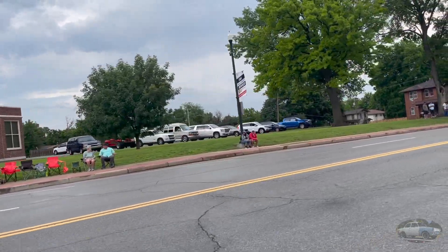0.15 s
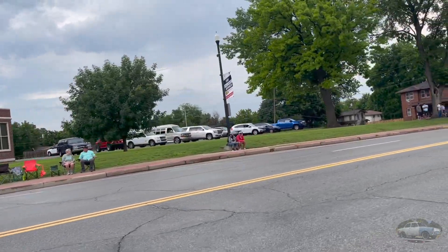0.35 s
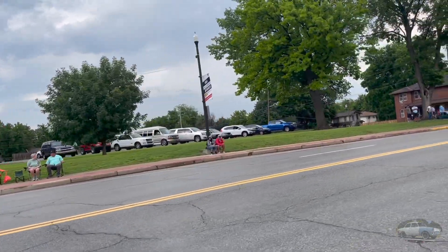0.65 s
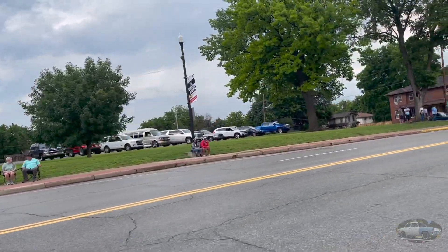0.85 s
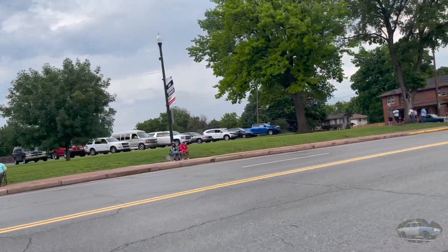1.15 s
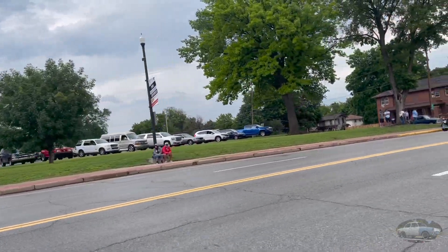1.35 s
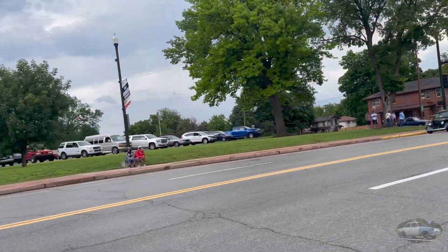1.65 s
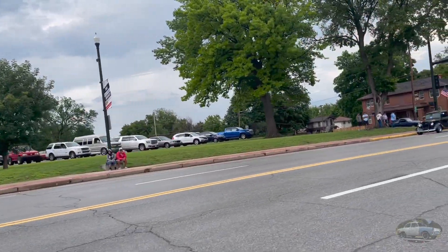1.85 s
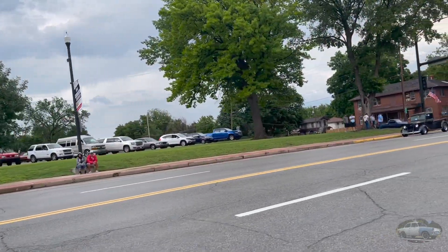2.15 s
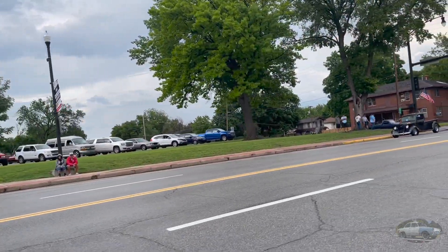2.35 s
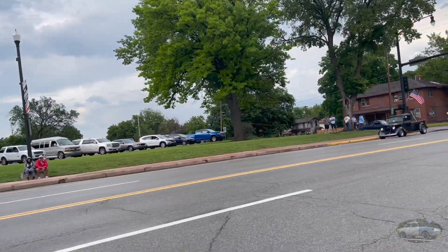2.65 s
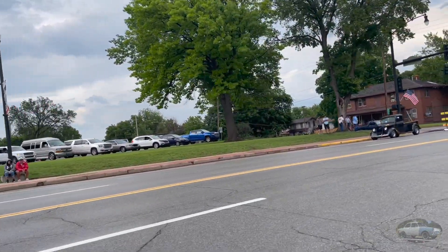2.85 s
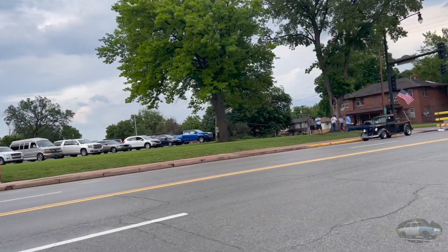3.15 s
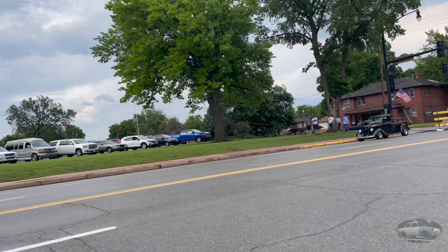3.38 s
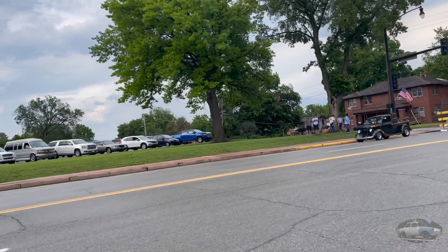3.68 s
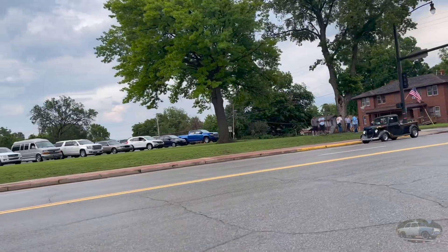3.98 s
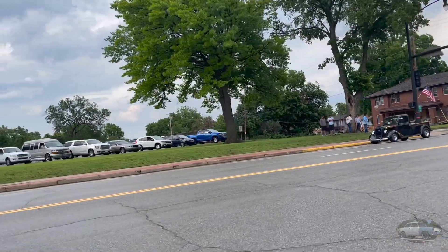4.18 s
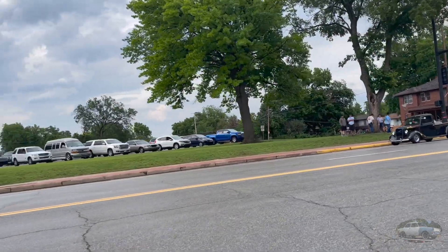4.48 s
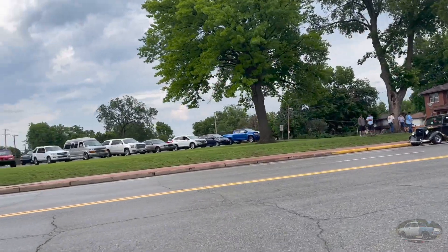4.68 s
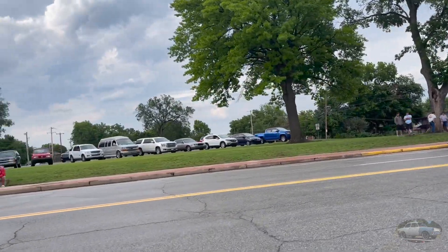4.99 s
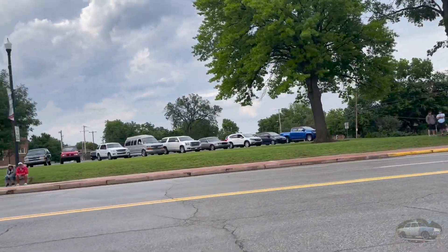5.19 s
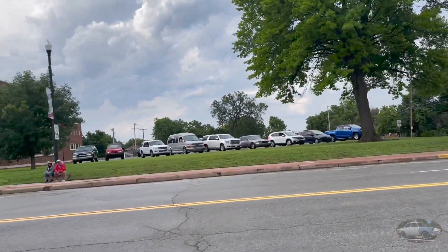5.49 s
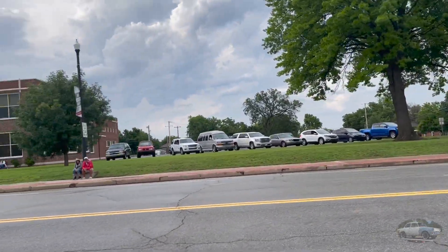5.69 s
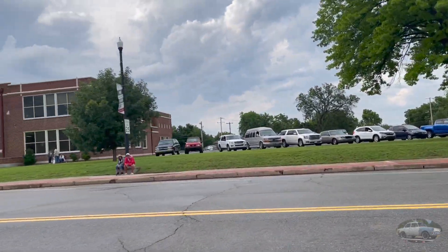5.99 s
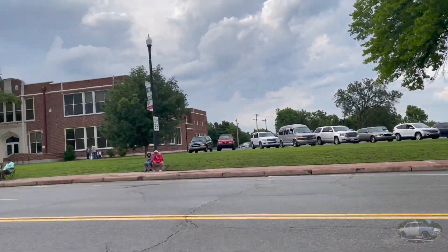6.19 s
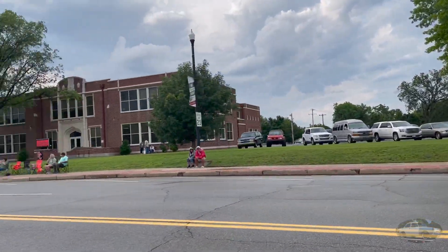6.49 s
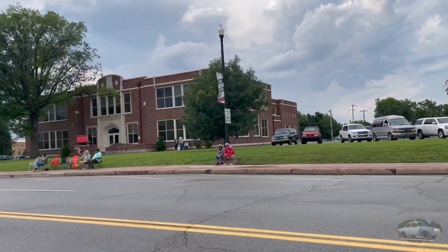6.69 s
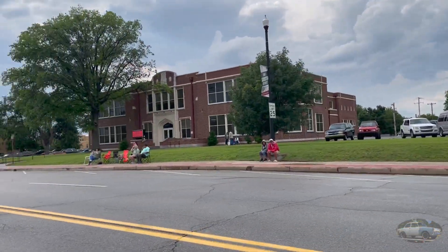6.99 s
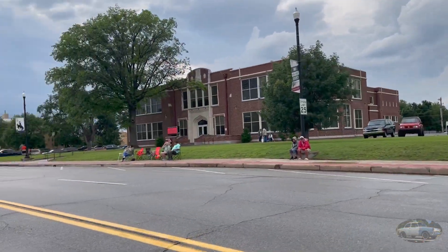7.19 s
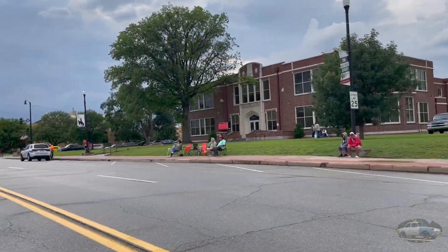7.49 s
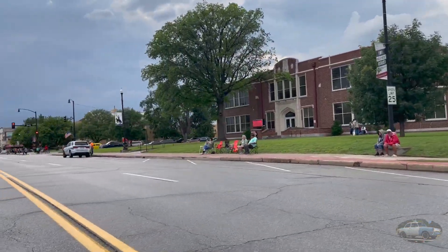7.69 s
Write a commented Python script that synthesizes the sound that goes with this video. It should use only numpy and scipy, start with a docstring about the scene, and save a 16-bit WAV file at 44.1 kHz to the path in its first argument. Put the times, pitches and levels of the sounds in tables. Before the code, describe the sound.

Inside a car by an open side window on a town street, a V8 burbles at low revs with a faint whine over deep road rumble and soft tyre roar. Around three seconds the throttle eases; the pitch sinks and the cabin booms. Wind then grows, with faint whistles, hiss and dense low thumps on the microphone as it swings round. Near the end the bass briefly thins.

```python
"""A V8 car rolls along a town street at low revs, heard by an open side window.
First, engine lines form a burble and thin whine over noise-shaped road rumble and tyre roar.
The throttle is eased at 3.3 s: the revs sink, resonant noise booms in the cabin, and an axle tone sings a while.
The draught (filtered noise) then swells, with faint whistles, gusts and short buffets on the microphone.
It swings round from 5.6 s, moving the exhaust in stereo; from 6.7 to 7.3 s the bass drops away."""
import sys
import numpy as np
from scipy import signal
from scipy.fft import rfft, irfft
from scipy.io import wavfile

SR = 44100
rng = np.random.default_rng(int(sys.argv[2]) if len(sys.argv) > 2 else 0)


def generate_wav(sig):
    """Save sig (samples, or channels by samples) to the path in sys.argv[1] as 16-bit PCM at SR."""
    pcm = np.round(np.clip(np.atleast_2d(sig).T, -1, 1) * 32767).astype(np.int16)
    wavfile.write(sys.argv[1], SR, pcm)


N = 345744
TIME_S = np.arange(N) / SR

# Microphone ports: (frequency [Hz], left-right likeness [-1..1], left lead [rad])
PORTS = [(40, .98, 0), (90, .95, 0), (250, .8, .2), (480, .3, 1.3), (700, .6, 2.2), (1200, .35, 3.2),
         (2100, .5, 6.1), (3300, .7, 7.5), (4900, .3, 7.0), (6500, .7, 6.3), (7700, .7, 6.9),
         (8600, .98, 6.25), (9400, .82, 4.6), (10230, .995, 3.14), (11100, .72, 1.6), (11800, .99, 0)]

# Noise spectra, relative levels: (frequency [Hz], density [dB per Hz])
RUMBLE_SPECTRUM = [(22, -25), (36, -12), (48, -4.5), (60, -3), (84, -2), (105, -5), (125, -9), (150, -3),
                   (176, -4.5), (195, -15), (270, -24), (400, -42.5), (800, -70)]
TYRE_SPECTRUM = [(150, -7), (330, -0.5), (480, -1), (580, -3.5), (710, -1.5), (800, -8.5), (1000, -4.5),
                 (1090, -7.5), (1250, -12), (2100, -17.5), (3000, -24.5), (4300, -27), (5300, -28.5),
                 (7200, -33.5), (10200, -30), (11300, -28.5), (11900, -66)]
TURBULENCE_SPECTRUM = [(30, -14), (70, 4), (125, 11), (230, 1), (330, -8), (520, -18.5), (750, -18.5),
                       (1200, -40.5), (3000, -42.5)]
RUSH_SPECTRUM = [(900, 6), (1550, 7), (1850, 6), (2450, 6), (3200, 2), (3850, 3.5), (4450, -17),
                 (5700, -16), (8000, -40)]
HISS_SPECTRUM = [(2000, -7), (5000, -1), (5750, -3), (6450, 3), (7500, -2), (8500, 5.5), (9400, 1),
                 (10150, -1.5), (11000, -5), (12200, -10)]

# Gusts on the microphone: (start [s], end [s], turbulence level [dB])
GUSTS = [(4.749, 5.61, -36), (5.678, 6.627, -29), (6.738, 7.24, -39), (7.323, 7.794, -34.5)]
# Lasting changes of the draught: (start [s], rise [s], rush gain [dB], hiss gain [dB], thin-hiss gain [dB])
DRAUGHT_SWELLS = [(4.2, 0.33, 6, 3, 13), (4.9, 0.56, 0.5, 2, 5), (6.3, 0.54, 4, 7.5, 4.5),
                  (7.5, 0.19, 1.5, 4.5, -18)]
# Brief flares of the draught: (centre [s], rush level [dB], hiss level [dB], length [s])
DRAUGHT_FLARES = [(0.95, -64, -59, .012), (5.355, -67, -60, 0.012), (6.645, -60, -51, 0.0064),
                  (6.798, -50.5, -53, 0.007), (6.87, -55, -62, 0.01), (7.16, -49.5, -48, 0.0063),
                  (7.215, -49.5, -52, 0.014), (7.385, -53, -56.5, 0.019), (7.435, -54.5, -64, 0.008),
                  (7.662, -51, -53, .011), (7.728, -47, -54, 0.013), (7.785, -57, -70, .016)]
# Air whistling at the window edge: (centre [s], frequency [Hz], level [dB], length [s])
WHISTLES = [(4.7, 2900, -66, .22), (4.47, 2900, -66, .04), (4.68, 2950, -61, .04), (4.728, 4260, -63, .03),
            (4.86, 2950, -62, .035), (4.985, 3400, -62, .018), (5.355, 4350, -66, .015),
            (6.81, 3300, -57, .015), (6.87, 2850, -54, .018)]
# Wind buffets: (start [s], peak before panning [dB], length [s], upper edge [Hz])
BUFFETS = [(4.897, -19.5, 0.014, 496), (5.143, -32, .016, 380), (5.345, -30, 0.019, 344),
           (5.644, -22, 0.014, 435), (5.715, -20.5, 0.028, 326), (5.785, -20.5, 0.03, 360),
           (5.805, -22.5, 0.0056, 560), (5.856, -14, 0.019, 486), (5.924, -14, 0.016, 483),
           (5.948, -25.5, 0.014, 735), (6.004, -22, 0.012, 515), (6.076, -12, 0.012, 464),
           (6.098, -18, 0.023, 350), (6.117, -14, 0.0095, 490), (6.13, -19, 0.032, 294),
           (6.198, -18, 0.021, 465), (6.217, -22, 0.021, 395), (6.31, -21.5, .016, 315),
           (6.36, -21.5, 0.037, 276), (6.396, -15, 0.015, 354), (6.417, -13, 0.011, 556),
           (6.433, -14, 0.0047, 480), (6.497, -18.5, 0.0032, 890), (6.502, -13, 0.011, 526),
           (6.542, -23, 0.0099, 666), (6.59, -19.5, 0.0101, 506), (6.604, -15, 0.014, 530),
           (6.655, -21, 0.017, 218), (6.772, -25, 0.031, 484), (6.882, -25.5, 0.013, 694),
           (6.914, -27, 0.013, 403), (6.999, -26, 0.0048, 900), (6.997, -17.5, 0.008, 434),
           (7.078, -27, .009, 600), (7.388, -25, 0.014, 423), (7.531, -21.5, 0.0047, 910),
           (7.53, -16.5, 0.0052, 455), (7.722, -21, 0.018, 392), (7.772, -13, 0.004, 335),
           (7.779, -15, 0.0078, 544)]

# Level the body panels give a higher engine line: (frequency [Hz], level [dB])
PANELS = [(250, -59.5), (370, -60.5), (410, -62), (500, -62.5), (545, -65), (610, -65), (660, -61.5),
          (700, -56.5), (730, -61), (790, -71), (860, -73), (920, -70), (1010, -68.5), (1200, -77)]
# Lines that stand out or sink: (multiple of cycle rate, cruising gain [dB], off-throttle gain [dB])
WHINE_LINES = [(36, -5, -4), (38, -7, -1), (39, 3, -4), (40, -6, -3), (42, 5, -2), (43, -1.5, -3),
               (44, -2, -3), (45, -4, 2), (46, 5, 0), (47, -1, -4), (48, 0, 4), (49, -1, -6), (50, -3, 2)]
# Engine speed: (time [s], four-stroke cycle rate [Hz])
ENGINE_SPEED = [(0.0, 17.01), (0.7, 16.86), (1.4, 16.77), (2.1, 16.58), (2.9, 16.53), (3.4, 16.28),
                (4.0, 15.71), (4.5, 15.21), (5.1, 14.51), (5.6, 13.94), (6.1, 13.07), (6.8, 12.46),
                (7.3, 12.12), (7.84, 12.03)]
# Exhaust lines: (multiple of cycle rate, cruising [dB], coasting [dB], idling [dB])
EXHAUST_LINES = [(2, -41, -50, -60), (3, -38, -45, -49), (4, -27, -32, -36), (5, -34, -31, -33.5),
                 (6, -33, -28, -34), (7, -36, -47, -39), (8, -41, -39, -36), (9, -42, -46, -40),
                 (10, -47, -49, -48), (11, -41, -41, -45), (12, -45, -51, -48), (13, -49, -48, -50),
                 (14, -51, -57, -44), (15, -47, -57, -45), (16, -53, -55, -53), (17, -59, -55, -54),
                 (18, -58, -56, -54), (19, -58, -51, -51), (20, -55, -57, -55)]

# Rumble: base level, change at full throttle, share of a gust's swing added
RUMBLE_BASE_DB, RUMBLE_PULLING_DB, GUST_RUMBLE_SHARE = -30, -4.5, 0.51
BREEZE_DB, GUST_RISE_S, GUST_FALL_S = -39, 0.046, 0.022
# Draught before swells and flares
RUSH_START_DB, HISS_START_DB, THIN_HISS_START_DB = -64.5, -69, -80.5
THIN_HISS_HZ, THIN_HISS_WIDTH_HZ = 8970, 1300
AXLE_HZ, AXLE_DB, AXLE_START_S, AXLE_END_S, AXLE_EDGE_S = 541, -56, 4.1, 5.6, 0.25
WHINE_LEAD_S = 0.0003
EASE_START_S, EASE_LENGTH_S = 3.27, 0.53
IDLE_FROM_HZ, IDLE_FULL_HZ = 13.9, 12.9  # cycle rate
OVERRUN_START_DB, OVERRUN_HZ, OVERRUN_WIDTH_HZ = -29.5, 76.5, 20.7
OVERRUN_RISE_S, OVERRUN_FADE_DB_PER_S = 0.3, 3
DRIVELINE_RATIO, DRIVELINE_DB = 4.55, -36.5  # ratio to cycle rate
TURN_START_S, TURN_LENGTH_S = 5.6, 1.1
EXHAUST_START_LEFT_DB, TURNED_LEAD_S = -1.6, 0.0005
DIP_START_S, DIP_END_S, DIP_FALL_S, DIP_RETURN_S = 6.67, 7.28, 0.04, 0.18
DIP_EXHAUST_DB, DIP_RUMBLE_DB = -7, -8.5
CEILING, CUTOFF_HZ = 0.45, 12100


def from_db(db):
    """Decibels to amplitude gain."""
    return 10 ** (np.asarray(db) / 20)


def rms_one(x):
    """Scale to unit power."""
    return x / np.sqrt(np.mean(x ** 2) + 1e-20)


def at_hz(points, hz):
    """Interpolate a curve on a log-frequency axis."""
    at, values = np.transpose(points)
    return np.interp(np.log(hz + 1e-9), np.log(at), values)


def pan(left_db):
    """Two channel gains, left_db apart."""
    return from_db(np.array([[0.5], [-0.5]]) * left_db)


def ramp(start_s, length_s):
    """Linear rise from 0 to 1."""
    return np.clip((TIME_S - start_s) / max(length_s, 0.001), 0, 1)


def drift(rate_hz):
    """Low-passed random drift with a spread of 1, drawn at every 48th sample."""
    step = 48
    coarse_s = TIME_S[::step]
    hz = np.fft.rfftfreq(len(coarse_s), step / SR)
    spectrum = rfft(rng.standard_normal(len(coarse_s))) / (1 + (hz / rate_hz) ** 2)
    slow = irfft(spectrum, len(coarse_s))
    return np.interp(TIME_S, coarse_s, rms_one(slow))


def noise(spectrum, likeness=None):
    """Coloured stereo noise, rms 1, with the ports' phase lead and, by default, their likeness."""
    hz = np.fft.rfftfreq(N, 1 / SR)
    ports = np.array(PORTS)
    alike = at_hz(ports[:, :2], hz) if likeness is None else likeness
    alike = np.clip(alike, -1, 1)
    mid, side = rfft(rng.standard_normal((2, N)))
    both = np.sqrt(1 + alike) * mid + np.sqrt(1 - alike) * side * [[1], [-1]]
    both[0] *= np.exp(1j * at_hz(ports[:, ::2], hz))
    # 12 dB per octave beyond the outer points
    low_end = np.minimum(hz / spectrum[0][0], 1) ** 2
    high_end = np.maximum(hz / spectrum[-1][0], 1) ** 2
    colour = from_db(at_hz(spectrum, hz)) * low_end / high_end
    return rms_one(irfft(both * colour, N))


def patchy(spectrum, low_hz, high_hz, count):
    """Noise whose narrow bands swell and fade independently; rms 1."""
    depth_db, rate_hz = 3.2, 16
    sources = [noise(spectrum), noise(spectrum)]
    edges_hz = np.geomspace(low_hz, high_hz, count + 1)
    out = 0
    for k in range(count):
        sos = signal.butter(2, edges_hz[k:k + 2], "band", fs=SR, output="sos")
        band = signal.sosfilt(sos, sources[k % 2])
        out = out + from_db(depth_db * drift(rate_hz)) * band
    return rms_one(out)


def resonance(x, hz, width_hz):
    """Two-pole resonance with about unit gain on top."""
    r = np.exp(-np.pi * width_hz / SR)
    zeros = np.array([1, 0, -1]) * (1 - r * r) / 2
    poles = [1, -2 * r * np.cos(2 * np.pi * hz / SR), r * r]
    return signal.lfilter(zeros, poles, x)


def gust_level():
    """Turbulence level in dB: a light breeze, and gusts that rise, hold and fall."""
    level_db = np.full(N, float(BREEZE_DB))
    for start_s, end_s, gust_db in GUSTS:
        gust = ramp(start_s, GUST_RISE_S) - ramp(end_s, GUST_FALL_S)
        level_db += (gust_db - BREEZE_DB) * gust
    return level_db


def rumble(throttle, dip, turbulence_db):
    """Low cabin noise, quieter under throttle and stirred by gusts."""
    level_db = RUMBLE_BASE_DB + RUMBLE_PULLING_DB * throttle + DIP_RUMBLE_DB * dip
    level_db = level_db + GUST_RUMBLE_SHARE * (turbulence_db - BREEZE_DB)
    return from_db(level_db) * noise(RUMBLE_SPECTRUM) * pan(-3.4)


def tyres(cycles, roar_db=-43.0, grain_db=0.44, throb=0.036):
    """Steady noise roar that throbs a little with the engine cycle."""
    level = from_db(roar_db + grain_db * drift(3.0))
    return level * noise(TYRE_SPECTRUM) * (1 + throb * np.sin(2 * np.pi * cycles)) * pan(0.45)


def slipstream(turbulence_db, lump_db=4.5, flutter_db=1.2):
    """Air past the window: lumpy turbulence below, patchy rush, and broad and thin hiss above."""
    gains_db = np.zeros((3, N))
    for start_s, rise_s, *gained_db in DRAUGHT_SWELLS:
        gains_db += np.outer(gained_db, ramp(start_s, rise_s))
    rush_db, hiss_db, thin_db = gains_db

    flares = np.zeros((2, N))
    for centre_s, *levels_db, length_s in DRAUGHT_FLARES:
        shape = np.exp(-((TIME_S - centre_s) / length_s / 2) ** 2)
        flares += np.outer(from_db(levels_db), shape)
    rush_flare, hiss_flare = flares

    churn = from_db(turbulence_db + lump_db * drift(69)) * noise(TURBULENCE_SPECTRUM, likeness=0.14)
    rush_level = np.hypot(from_db(RUSH_START_DB + rush_db), rush_flare)
    rush = rush_level * patchy(RUSH_SPECTRUM, 1287, 5200, count=20)
    hiss_level = np.hypot(from_db(HISS_START_DB + hiss_db + flutter_db * drift(34)), hiss_flare)
    hiss = hiss_level * patchy(HISS_SPECTRUM, 2502, 12350, count=30)
    thin_noise = rms_one(resonance(noise(HISS_SPECTRUM), THIN_HISS_HZ, THIN_HISS_WIDTH_HZ))
    thin = from_db(THIN_HISS_START_DB + thin_db) * thin_noise
    return churn * pan(5.0) + rush * pan(5.4) + (hiss + thin) * pan(0.3)


def whistles(width_hz=90):
    """Brief swells of noise, each through one narrow resonance applied twice."""
    out = np.zeros(N)
    for centre_s, hz, level_db, length_s in WHISTLES:
        once = resonance(rng.standard_normal(N), hz, width_hz)
        tone = rms_one(resonance(once, hz, width_hz))
        out += from_db(level_db) * np.exp(-((TIME_S - centre_s) / length_s) ** 2 / 2) * tone
    return out * pan(3.7)


def buffets(low_hz=160, apart=0.18, skirt=1.3):
    """Eddies hit the ports as brief noise bursts that fall ever more steeply above their upper edge."""
    out, size = np.zeros((2, N)), SR // 8
    for start_s, level_db, length_s, top_hz in BUFFETS:
        age = np.arange(size) / SR / length_s
        swell = np.exp(-(2 * age - 1) ** 2) * np.minimum(4 * age, 1)
        spectrum = rfft(swell * rng.standard_normal((2, size)))
        # equal magnitudes even out the burst's spectrum
        burst = np.sqrt(swell) * irfft(spectrum / (np.abs(spectrum) + 1e-12), size)
        top_hz = max(top_hz, 1.2 * low_hz)
        band = signal.butter(2, [low_hz, top_hz], "band", fs=SR, output="sos")
        lowpass = signal.butter(3, skirt * top_hz, fs=SR, output="sos")
        mid, side = signal.sosfilt(lowpass, signal.sosfilt(band, burst))
        eddy = mid + apart * side * [[1], [-1]]
        start = int(start_s * SR)
        out[:, start:start + size] += from_db(level_db) * eddy[:, :N - start] / np.abs(mid).max()
    return out * pan(1.1)


def axle():
    """One thin, slightly unsteady gear tone while the wheels drive the engine."""
    coasting = ramp(AXLE_START_S, AXLE_EDGE_S) - ramp(AXLE_END_S, AXLE_EDGE_S)
    phase = 2 * np.pi * AXLE_HZ * TIME_S + 0.5 * drift(2)
    return np.sqrt(2) * from_db(AXLE_DB) * coasting * np.sin([phase + 1, phase])


def revs():
    """Cycle rate in Hz, throttle (0-1) and nearness to idling (0-1)."""
    speed_hz = np.interp(TIME_S, *np.transpose(ENGINE_SPEED))
    idling = np.clip((IDLE_FROM_HZ - speed_hz) / (IDLE_FROM_HZ - IDLE_FULL_HZ), 0, 1)
    throttle = 1 - ramp(EASE_START_S, EASE_LENGTH_S)
    return speed_hz, throttle, idling


def whine(speed_hz, cycles, throttle):
    """Higher engine lines slide through panel resonances; their phase wavers more off the throttle."""
    waver_db, pulling_rad, loose_rad = 1.6, 0.2, 0.45
    wavers = [drift(2.5) for _ in range(11)]
    added_db = {round(k): (on_db, off_db) for k, on_db, off_db in WHINE_LINES}
    unsteady_rad = loose_rad + (pulling_rad - loose_rad) * throttle
    out = np.zeros((2, N))
    for k in range(21, 68):
        on_db, off_db = added_db.get(k, (0, 0))
        level_db = at_hz(PANELS, k * speed_hz) + off_db + (on_db - off_db) * throttle
        level_db = level_db + waver_db * wavers[k % len(wavers)]
        phase = 2 * np.pi * (k * cycles + rng.random())
        phase = phase + unsteady_rad * wavers[(2 * k + 1) % len(wavers)]
        lead_rad = 2 * np.pi * k * speed_hz * WHINE_LEAD_S
        out += from_db(level_db) * np.sin([phase + lead_rad, phase])
    return np.sqrt(2) * out * pan(1.7)


def overrun():
    """Uneven firing, as noise, rings the cabin's boom once the throttle is eased, then fades."""
    once = resonance(rng.standard_normal(N), OVERRUN_HZ, OVERRUN_WIDTH_HZ)
    boom = rms_one(resonance(once, OVERRUN_HZ, OVERRUN_WIDTH_HZ))
    fade_db = OVERRUN_FADE_DB_PER_S * np.maximum(TIME_S - EASE_START_S, 0)
    return from_db(OVERRUN_START_DB - fade_db) * ramp(EASE_START_S, OVERRUN_RISE_S) * boom


def engine(cycles, throttle, idling, waver_db=0.8, scatter=0.55):
    """Uneven exhaust pulses as lines at multiples of the cycle rate, balanced by load."""
    wavers = [waver_db * drift(2) for _ in range(5)]
    out = np.zeros(N)
    for multiple, cruising_db, coasting_db, idling_db in EXHAUST_LINES:
        k = round(multiple)
        off_db = coasting_db + idling * (idling_db - coasting_db)
        level_db = throttle * cruising_db + (1 - throttle) * off_db
        # lines partly in step lump together once a cycle: the burble
        phase = 2 * np.pi * (k * cycles + scatter * rng.random())
        out += from_db(level_db + wavers[k % len(wavers)]) * np.sin(phase)
    # geared driveline hum beats against the exhaust
    out += from_db(DRIVELINE_DB) * np.sin(2 * np.pi * DRIVELINE_RATIO * cycles)
    return np.sqrt(2) * out


def turning(x):
    """As the microphone swings round, the rightward lean halves and the left port gains a time lead."""
    turn = ramp(TURN_START_S, TURN_LENGTH_S)
    late = np.interp(TIME_S - TURNED_LEAD_S * turn, TIME_S, x)
    return np.array([x, late]) * pan(EXHAUST_START_LEFT_DB * (1 - 0.5 * turn))


def scene():
    """Sum road, air and engine; the dip lowers exhaust and rumble."""
    speed_hz, throttle, idling = revs()
    cycles = np.cumsum(speed_hz) / SR
    turbulence_db = gust_level()
    dip = ramp(DIP_START_S, DIP_FALL_S) - ramp(DIP_END_S, DIP_RETURN_S)
    road = rumble(throttle, dip, turbulence_db) + tyres(cycles)
    air = slipstream(turbulence_db) + whistles() + buffets()
    exhaust = turning(engine(cycles, throttle, idling) + overrun())
    exhaust = from_db(DIP_EXHAUST_DB * dip) * exhaust
    return road + air + axle() + whine(speed_hz, cycles, throttle) + exhaust


def record(dry):
    """Fade both ends over 3 ms, round the peaks and cut the top."""
    edges = np.minimum(np.minimum(TIME_S, TIME_S[-1] - TIME_S) / 0.003, 1)
    rounded = CEILING * np.tanh(dry * edges / CEILING)
    lowpass = signal.ellip(10, 0.3, 80, CUTOFF_HZ, fs=SR, output="sos")
    return signal.sosfilt(lowpass, rounded)


dry = scene()
out = record(dry)
generate_wav(out)
```